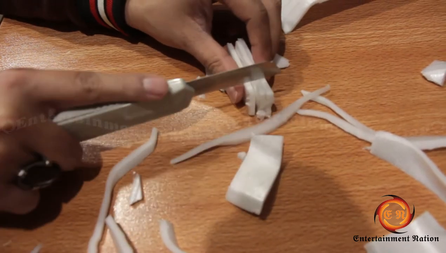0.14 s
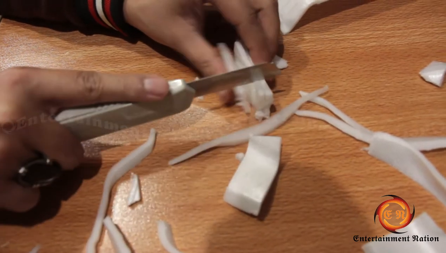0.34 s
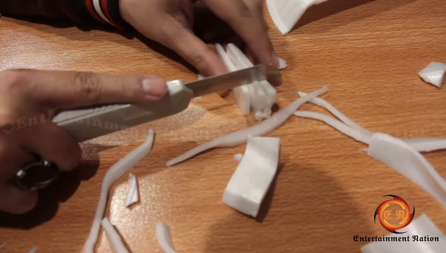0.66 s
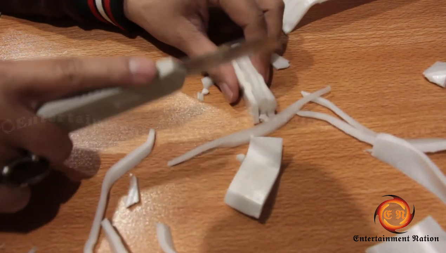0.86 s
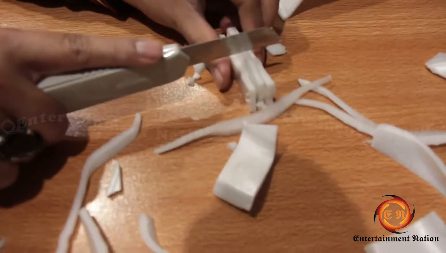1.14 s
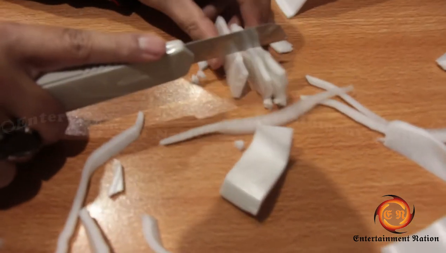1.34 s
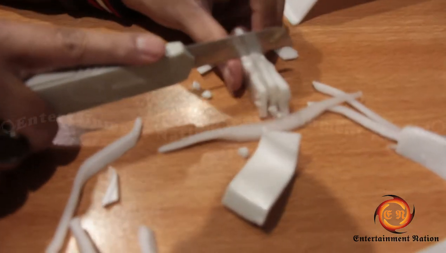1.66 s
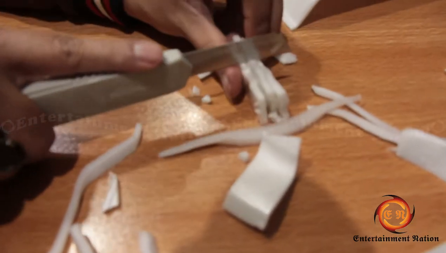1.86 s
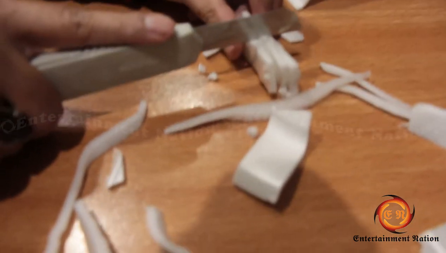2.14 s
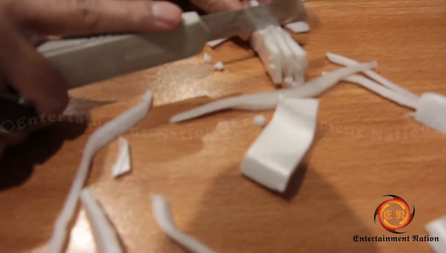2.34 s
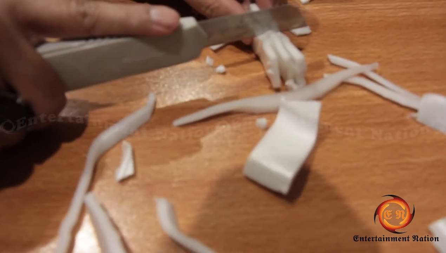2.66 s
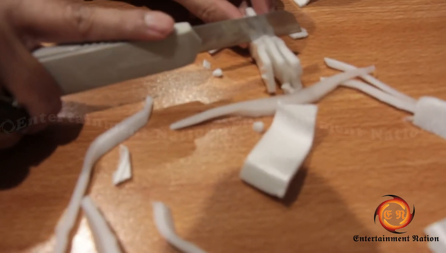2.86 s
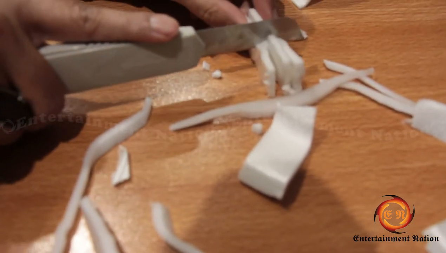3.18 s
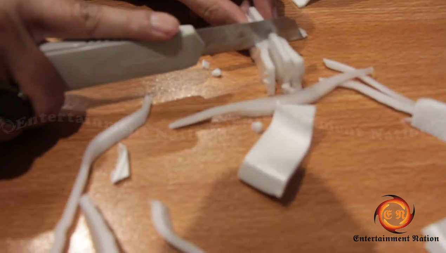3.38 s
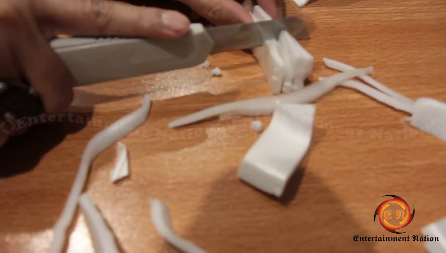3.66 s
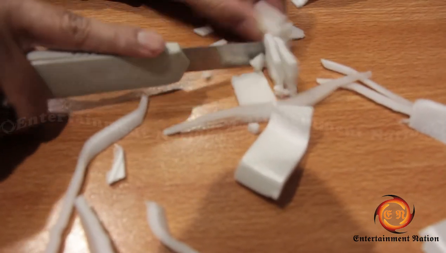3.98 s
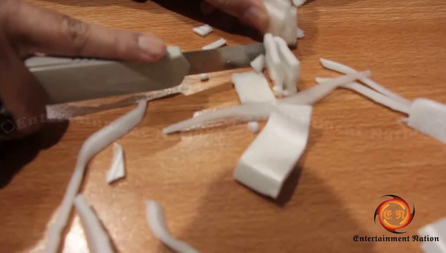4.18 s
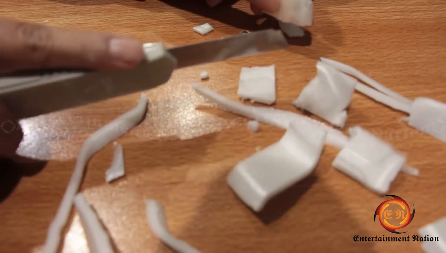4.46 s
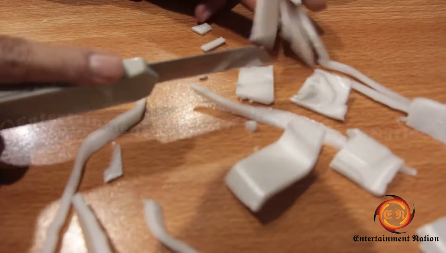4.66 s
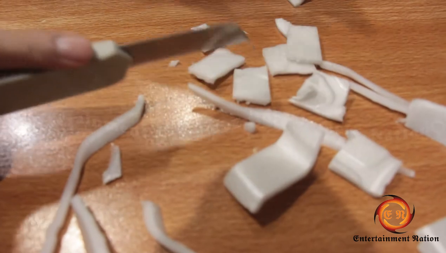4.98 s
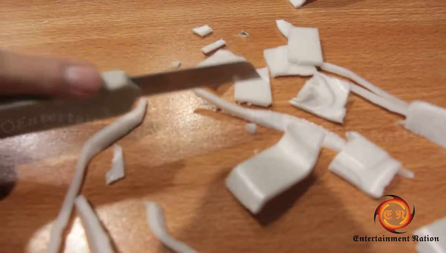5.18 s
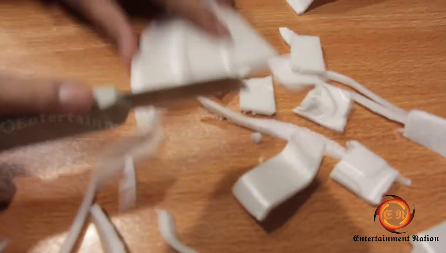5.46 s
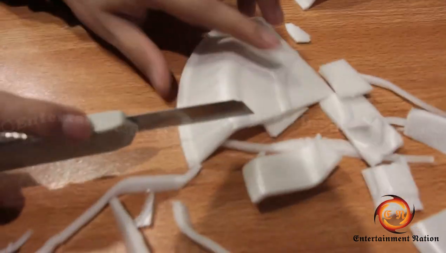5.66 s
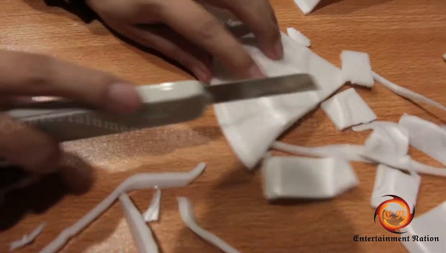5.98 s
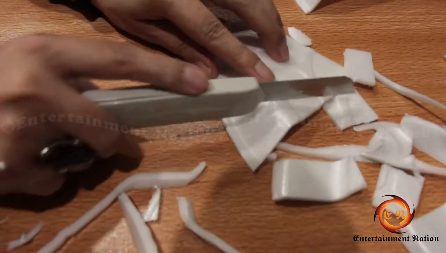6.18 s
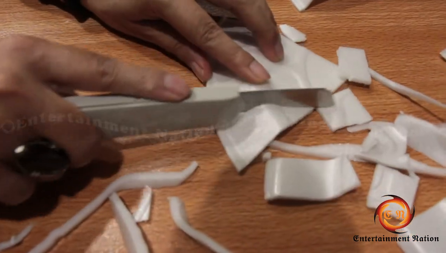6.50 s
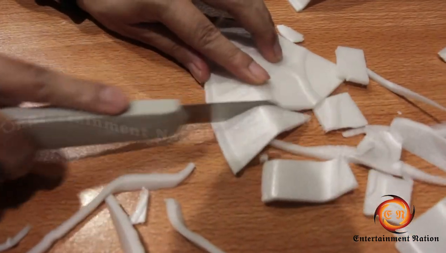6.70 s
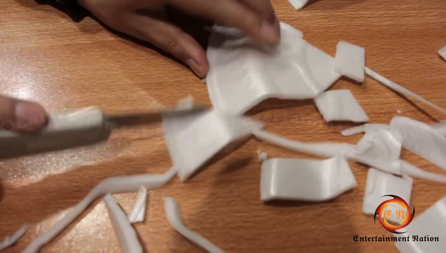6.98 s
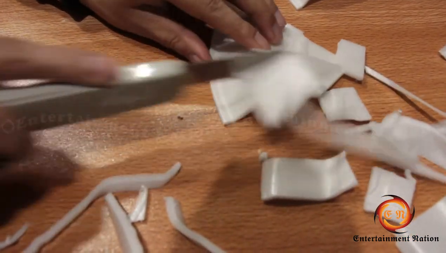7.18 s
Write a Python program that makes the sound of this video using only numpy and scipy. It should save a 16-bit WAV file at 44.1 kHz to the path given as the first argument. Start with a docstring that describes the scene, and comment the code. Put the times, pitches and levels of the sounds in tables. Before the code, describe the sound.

Close, short knife strokes crunch through foam plate, followed by a sliding scuff and one long creaking cut, over a faint hum.

```python
"""A wooden table in a small room with a faint mains hum, heard close up and a little to the right.
A utility knife is pressed through a folded stack of foam plate: the foam sticks and slips in a rasp,
its cell walls crack, and it parts with a crunch and a knock on the table. Offcuts scuff aside,
a new piece is dropped and slid into place, and the blade slices it with a creak and one sharp pop."""
import sys
import numpy as np
from scipy import signal
from scipy.fft import rfft, irfft, next_fast_len
from scipy.io import wavfile
from scipy.ndimage import uniform_filter1d, map_coordinates

SR = 44100
rng = np.random.default_rng(int(sys.argv[2]) if len(sys.argv) > 2 else 0)


def generate_wav(sig):
    """Save sig (samples, or channels by samples) to the path in sys.argv[1] as 16-bit PCM at SR."""
    pcm = np.round(np.clip(np.atleast_2d(sig).T, -1, 1) * 32767).astype(np.int16)
    wavfile.write(sys.argv[1], SR, pcm)


N = 323694

# pushes of the blade into the folded stack: start_s, length_s, hiss_db, rasp_db
STACK_PUSHES = [(0.005, 0.098, -56, -59), (0.188, 0.025, -45, -45), (0.366, 0.094, -55, -58.5),
                (0.471, 0.15, -49, -52), (0.666, 0.029, -41.5, -41.5), (0.724, 0.026, -60, -52),
                (0.753, 0.092, -47, -49), (0.946, 0.18, -58, -60.5), (1.151, 0.02, -50.5, -55),
                (1.232, 0.027, -53, -60), (1.329, 0.11, -49.5, -46.5), (1.482, 0.083, -52, -57),
                (1.565, 0.13, -47, -54.5), (1.732, 0.097, -54.5, -56), (2.026, 0.073, -45, -48),
                (2.183, 0.14, -53.5, -57.5), (2.381, 0.07, -48.5, -56), (2.527, 0.026, -44.5, -50.5),
                (2.645, 0.017, -48, -81), (2.785, 0.038, -41, -55.5), (2.977, 0.051, -40, -51),
                (3.116, 0.055, -44, -54), (3.188, 0.1, -38, -48.5), (3.423, 0.042, -41.5, -50.5),
                (3.585, 0.053, -42.5, -46.5), (3.741, 0.033, -48, -52), (3.785, 0.066, -36.5, -51),
                (3.918, 0.093, -37, -54)]
# the last layers give way in one swelling crunch: time_s, hiss_db, rasp_db
FINAL_CRUNCH = [(3.99, -38, -44), (4.005, -28, -38), (4.012, -23, -35), (4.022, -23.5, -31),
                (4.033, -21, -26), (4.046, -47, -35)]


def amp(db):
    """Decibels to gain."""
    return 10 ** (np.asarray(db) / 20)


def unit(x):
    """Scale to rms 1."""
    return x / np.sqrt(np.mean(x ** 2) + 1e-20)


def along(points, hz):
    """Read a curve of (freq_hz, value) points on a log frequency axis."""
    freqs, values = np.transpose(points)
    return np.interp(np.log(hz + 1), np.log(freqs + 1), values)


def wobble(rate):
    """A smooth random curve with rate knots a second."""
    return map_coordinates(rng.standard_normal(int(N * rate / SR) + 4), [np.arange(N) * rate / SR])


def filtered(x, response):
    """Pass x through a frequency response."""
    size = x.shape[-1]
    padded = 2 * next_fast_len(size // 2 + 2048)
    return irfft(rfft(x, padded) * response(np.fft.rfftfreq(padded, 1 / SR)), padded)[..., :size]


def causal(gain):
    """The minimum-phase response that has this gain."""
    cepstrum = irfft(np.log(np.maximum(gain, 1e-6)))
    half = len(cepstrum) // 2
    cepstrum[1:half] *= 2
    cepstrum[half + 1:] = 0
    return np.exp(rfft(cepstrum))


def add(track, start_s, sound):
    """Mix a sound into the track."""
    part = track[round(start_s * SR):][:len(sound)]
    part += sound[:len(part)]


def pushes(rows, attack_s, sag_db_per_s, release_db_per_s):
    """Hiss and rasp envelopes of short strokes: each bites, eases as the foam gives, then dies away."""
    gains, t = np.zeros((2, N)), np.arange(SR // 2) / SR
    for start_s, length_s, *levels in rows:
        fall_db = sag_db_per_s * t + release_db_per_s * np.maximum(t - length_s, 0)
        shape = np.minimum(t / attack_s, 1) * amp(-fall_db)
        for gain, db in zip(gains, levels):
            add(gain, start_s, amp(db) * shape)
    return gains


def long_stroke(curve):
    """Hiss and rasp envelopes of one long movement."""
    times, *levels = np.transpose(curve)
    return amp([np.interp(np.arange(N) / SR, times, db, left=-np.inf, right=-np.inf) for db in levels])


def room_tone(air_db, apart_db, hum_db, waver_db):
    """Still room air and a slightly wavering mains hum."""
    # colour of the air: freq_hz, level_db
    air_tone = [(20, -47), (50, -14), (90, -12), (150, -7), (230, -8.5), (350, -15.5), (700, -19.5),
                (2000, -25), (10000, -35.5), (16000, -46)]
    # mains hum: pitch_hz, level_db
    hum_partials = [(119.8, -56)]
    noise = rng.standard_normal(N) + amp(apart_db) * rng.standard_normal((2, N))
    air = unit(filtered(noise, lambda hz: amp(along(air_tone, hz))))
    t = np.arange(N) / SR
    hum = sum(amp(db) * np.sqrt(2) * np.sin(2 * np.pi * hz * t) for hz, db in hum_partials)
    return amp(air_db) * air + hum * amp(hum_db + waver_db * wobble(14))


def shifting_grip(x, depth_db):
    """Shifting grip and bend move the foam's resonances about."""
    spectrum = signal.stft(x, nperseg=512)[2]
    patches = uniform_filter1d(rng.standard_normal(spectrum.shape), size=4, axis=0)
    patches = uniform_filter1d(patches, size=20, axis=1)
    return signal.istft(spectrum * amp(depth_db * unit(patches)), nperseg=512)[1][:N]


def rub(gains, tone, slips_per_s, clump_db, scatter_db, grip_db):
    """Foam sticks and slips in tiny uneven jerks; the cells hiss above 3 kHz, the sheet rasps below."""
    hiss, rasp = gains
    jerks = (rng.random(N) < slips_per_s / SR) * rng.choice([-1, 1], N)
    jerks = jerks * amp(scatter_db * np.clip(rng.standard_normal(N), -2, 2))
    clumps = amp(clump_db * unit(wobble(240) + wobble(60)))
    friction = shifting_grip((unit(jerks) + 0.6 * rng.standard_normal(N)) * clumps, grip_db)
    body = irfft(causal(amp(along(tone, np.fft.rfftfreq(4096, 1 / SR)))))
    foam = signal.oaconvolve(friction, body)[:N]
    bending = filtered(foam, lambda hz: 1 / (1 + (hz / 3000) ** 8))
    return hiss * unit(foam - bending) + rasp * unit(bending)


def stack_cut():
    """The blade rasps through the folded stack, push by push, until the last layers give."""
    # colour of the rubbed stack: freq_hz, level_db
    stack_tone = [(350, -35), (600, -11), (869, -14.5), (1070, -7.5), (1430, -5), (2120, -8.5), (2440, 0.5),
                  (2870, -4.5), (3940, -3.5), (6500, -7.5), (9240, -11), (14300, -21), (16000, -30)]
    gains = pushes(STACK_PUSHES, attack_s=0.0098, sag_db_per_s=10.5, release_db_per_s=251)
    gains += long_stroke(FINAL_CRUNCH)
    return rub(gains, stack_tone, slips_per_s=700, clump_db=1.4, scatter_db=1.0, grip_db=2)


def crumbs(per_push, level_db, spread_db):
    """Small breaks at random moments of each push into the stack: start_s, crack_db, pop_db."""
    return [(start_s + length_s * rng.random(), *(np.array(levels) + rng.normal(level_db, spread_db)))
            for start_s, length_s, *levels in STACK_PUSHES for _ in range(per_push)]


def wall_crack(drive, dull_hz):
    """A breaking cell wall rings; each break frees a wall of slightly different size."""
    # resonances of the wall: centre_hz, width_hz, level_db
    wall_modes = [(3880, 420, 5.5), (4700, 720, 4), (6220, 1800, 1.5), (9000, 2900, -2.5)]
    modes = [(hz * rng.normal(1, 0.025), width, rng.normal(db, 1.5)) for hz, width, db in wall_modes]

    def response(hz):
        power = sum(abs(amp(db) * hz * width / (centre ** 2 - hz ** 2 + 1j * hz * width)) ** 2
                    for centre, width, db in modes)
        return causal(np.sqrt(power)) / (1 + (hz / dull_hz) ** 4)
    return filtered(drive, response)


def snaps(crumble, splinter, echo_s, echo_gain, crack_trim_db, pop_trim_db):
    """A fracture starts with one break and runs on for a few milliseconds; the table throws it back."""
    # sharp breaks and taps, where cell walls crack and the sheet pops: start_s, crack_db, pop_db
    breaks = [(0.184, -37, -39), (0.2, -38, -50), (0.2625, -29, -40), (0.2647, -31.5, -31.5),
              (0.37, -38, -44), (0.501, -39, -55), (0.765, -47, -46), (1.072, -38, -41.5),
              (1.08, -39.5, -39), (1.2405, -35, -47), (1.4983, -36.5, -39.5), (1.692, -37, -40),
              (1.9555, -46, -53), (1.987, -38.5, -47), (2.084, -38.5, -37), (2.1024, -35, -40),
              (2.3304, -40.5, -43), (2.3908, -31, -41), (2.536, -35, -45), (2.788, -35, -58),
              (2.8002, -31.5, -43.5), (2.8618, -35.5, -43.5), (2.948, -32.5, -42), (2.962, -33, -41),
              (2.9705, -38, -45), (2.9835, -13.5, -32), (2.992, -28, -41), (3.051, -35, -44),
              (3.1935, -11, -27.5), (3.2085, -14, -27), (3.267, -29, -44), (3.415, -38, -50),
              (3.4262, -19.5, -41), (3.4936, -36, -61.5), (3.5623, -29, -38), (3.6054, -35, -35.5),
              (3.6347, -35.5, -43), (3.7804, -25.5, -36), (3.804, -25, -37), (3.861, -34, -46),
              (3.899, -30, -40.5), (3.932, -33, -47), (3.9435, -32, -43), (3.983, -32, -38),
              (4.011, -16.5, -30), (4.0288, -16, -30), (4.0355, -19, -13.5), (4.2355, -44, -61),
              (4.252, -43, -48), (4.319, -44, -43), (4.488, -46, -51), (4.502, -39, -42.5),
              (4.743, -45.5, -48), (5.9204, -40, -25), (5.9255, -36, -20), (6.1373, -40, -41.5),
              (6.2472, -19, -23), (6.4922, -25.5, -35), (6.601, -23, -28), (6.6108, -23, -22),
              (6.6149, -13, -11.5), (6.6177, -22.5, -19.5), (6.705, -39, -27), (6.774, -41, -30),
              (6.7988, -27, -28), (6.8367, -25, -33), (6.8634, -41, -26), (7.012, -34, -50),
              (7.058, -35.5, -34.5)]
    # colour of the popping sheet: freq_hz, level_db
    pop_tone = [(100, -22), (450, -14.5), (900, -12.5), (1400, -3.5), (1850, -5), (2250, 1), (2900, -6.5),
                (3500, -13.5), (5000, -20), (15000, -65)]
    out, t = np.zeros(N), np.arange(SR // 20) / SR
    level_span = SR // 200  # each snap carries the energy of 5 ms at its level
    small_breaks = crumbs(per_push=2, level_db=-2.5, spread_db=3) + judder(count=7)
    for start_s, crack_db, pop_db in breaks + small_breaks:
        age = t * amp(crumble * max(crack_db, pop_db))  # weak breaks crumble more slowly
        shape = (1 - np.exp(-age / 0.00014)) * amp(-60 * np.maximum(age - 0.00065, 0) / 0.012)
        run = rng.standard_normal(len(t)) * shape
        fracture = (t == 0) + splinter * run / np.linalg.norm(run)
        delay_s = echo_s * amp(rng.normal())
        drive = filtered(fracture, lambda hz: 1 + echo_gain * np.exp(-2j * np.pi * hz * delay_s))
        crack = wall_crack(drive, dull_hz=14200)
        pop = filtered(drive, lambda hz: causal(amp(along(pop_tone, hz))))
        for sound, db in ((crack, crack_db + crack_trim_db), (pop, pop_db + pop_trim_db)):
            add(out, start_s, amp(db) * np.sqrt(level_span) * sound / np.linalg.norm(sound))
    return out


def blade_ticks(level_db):
    """A catch sets the thin steel ringing until the foam damps it."""
    # the blade is flicked as it catches: start_s, level_db
    catches = [(0.263, -34), (1.24, -32.5)]
    # modes of the blade: pitch_hz, level_db, t60_s
    blade_modes = [(2360, 3, 0.035), (6600, -8, 0.05), (7760, -5, 0.06), (8500, -2, 0.029)]
    out, t = np.zeros(N), np.arange(SR // 8) / SR
    for start_s, db in catches:
        ring = sum(amp(mode_db + rng.normal() - 60 * t / t60) * np.sin(2 * np.pi * hz * t)
                   for hz, mode_db, t60 in blade_modes)
        add(out, start_s, amp(db + level_db) * ring)
    return out


def judder(count):
    """The blade judders in a short, almost even train of slips: start_s, crack_db, pop_db."""
    # the train of slips: start_s, rate_hz, crack_db, pop_db
    slip_train = (3, 81.5, -39, -45.5)
    start_s, rate_hz, *levels = slip_train
    return [(start_s + rng.normal(k, 0.068) / rate_hz, *levels) for k in range(count)]


def creak(gain, centre_hz, width_hz, wander, slips_per_s, level_db):
    """Uneven slips ring the flexing sheet, whose one strong resonance wanders as the cut moves on."""
    size = len(gain)
    jerks = (rng.random(size) < slips_per_s / SR) * np.exp(2j * np.pi * rng.random(size))
    jerks *= amp(2.6 * rng.standard_normal(size))
    ring = signal.lfilter([1], [1, -np.exp(-np.pi * width_hz / SR)], jerks)
    ring = signal.lfilter([1], [1, -np.exp(-4 * np.pi * width_hz / SR)], ring)  # rounds each attack
    pitch_hz = centre_hz * (1 + wander * wobble(40)[:size])
    return amp(level_db) * gain * unit(np.real(ring * np.exp(2j * np.pi * np.cumsum(pitch_hz) / SR)))


def stack_creaks(attack_s, release_db_per_s):
    """A bent layer of the stack sounds its own resonance for as long as the blade drags on it."""
    # drags on a layer: start_s, length_s, pitch_hz, width_hz, level_db
    drags = [(3.205, 0.08, 900, 199, -49), (3.426, 0.0054, 3860, 260, -30), (3.44, 0.083, 3910, 300, -51),
             (3.77, 0.225, 1294, 130, -54.5), (4.04, 0.11, 2246, 300, -41)]
    out, t = np.zeros(N), np.arange(SR // 3) / SR
    for start_s, length_s, hz, width_hz, db in drags:
        shape = np.minimum(t / attack_s, 1) * amp(-release_db_per_s * np.maximum(t - length_s, 0))
        add(out, start_s, creak(shape, hz, width_hz, wander=0.015, slips_per_s=900, level_db=db))
    return out


def blade_squeaks(rise, waver, rough_db, overtone_db, bright_hz):
    """Now and then the slips lock into a pitch, which climbs as the blade speeds up."""
    # squeaks of the blade in the foam: start_s, length_s, target_pitch_hz, level_db
    squeaks = [(3.757, 0.063, 1286, -53), (7.059, 0.0037, 2940, -25.5)]
    out, drift, flutter = np.zeros(N), wobble(150), wobble(400.6)
    for start_s, length_s, hz, db in squeaks:
        span = np.arange(round(start_s * SR), round((start_s + length_s) * SR))
        progress = np.linspace(0, 1, len(span))
        pitch_hz = hz * (1 - rise * np.exp(-6 * progress) + waver * drift[span])
        phase = 2 * np.pi * np.cumsum(pitch_hz) / SR
        tone = sum(amp(overtone_db * (k - 1)) / (1 + (k * hz / bright_hz) ** 4) * np.sin(k * phase)
                   for k in range(1, 4))
        swell = np.sqrt(abs(np.sin(np.pi * progress)))
        add(out, start_s, unit(tone) * swell * amp(db + rough_db * flutter[span]))
    return out


def table_knocks(level_db, favour_db, thud_t60_s, thud_hz, thud_db):
    """Soft blows ring the table's low modes under a dull thud; the spot struck brings one forward."""
    # blows of blade, hand and plate: start_s, level_db, favoured_hz
    blows = [(4.032, -26, 232), (4.319, -43.5, 389), (5.287, -28.5, 389), (5.313, -30, 389),
             (6.615, -39, 232)]
    # modes of the table top: pitch_hz, level_db, t60_s
    table_modes = [(126.2, -6.5, 0.65), (174.4, -7, 0.42), (232, -11.5, 0.39), (389, -7, 0.24),
                   (518, -4.5, 0.08)]
    out, t = np.zeros(N), np.arange(SR // 2) / SR
    attack = 1 - np.exp(-t / 0.000087)
    for start_s, db, spot_hz in blows:
        favoured_hz = min(table_modes, key=lambda mode: abs(mode[0] - spot_hz))[0]
        ring = np.zeros(len(t))
        for hz, mode_db, t60 in table_modes:
            struck_db = mode_db + favour_db * (hz == favoured_hz) + rng.normal()
            ring += amp(struck_db - 60 * t / t60) * np.sin(2 * np.pi * (hz * t + rng.random()))
        thud = unit(filtered(rng.standard_normal(len(t)), lambda hz: 1 / (1 + 1j * hz / thud_hz) ** 2))
        thud *= amp(thud_db - 60 * t / thud_t60_s)
        add(out, start_s, amp(db + level_db) * (ring + thud) * attack)
    return filtered(out, lambda hz: (1j * hz / (45 + 1j * hz)) ** 3)  # low cut


def offcuts():
    """The foam creaks as it parts, and the offcuts scuff and creak over the table."""
    # scuffs: start_s, length_s, hiss_db, rasp_db
    scuffs = [(4.04, 0.078, -50.5, -33.5), (4.32, 0.056, -51.5, -47.5), (4.615, 0.025, -55, -72),
              (7.295, 0.025, -53, -54.5)]
    # colour of a scuff: freq_hz, level_db
    scuff_tone = [(250, -23), (450, -12.5), (900, -14.5), (1400, -8), (2250, -12), (2800, -11.5),
                  (3400, -4.5), (4600, 3), (10000, -2), (16000, -13)]
    gains = pushes(scuffs, attack_s=0.0048, sag_db_per_s=18, release_db_per_s=183)
    scuffing = rub(gains, scuff_tone, slips_per_s=600, clump_db=2.0, scatter_db=1.5, grip_db=2.5)
    flex = long_stroke(FINAL_CRUNCH)[1] + gains[1]  # the creak follows the rasp
    creaking = creak(flex, centre_hz=3490, width_hz=370, wander=0.0304, slips_per_s=540, level_db=-7.5)
    return scuffing + creaking


def sheet_slide():
    """The new piece rubs over the table as it slides into place."""
    # the slide: time_s, hiss_db, rasp_db
    slide_curve = [(5.2855, -36.5, -35.5), (5.33, -35.5, -39), (5.355, -26.5, -28.5), (5.4, -32, -38.5),
                   (5.57, -33, -36.5), (5.605, -27, -31.5), (5.68, -43.5, -40.5), (5.73, -67, -64)]
    # its colour: freq_hz, level_db
    slide_tone = [(300, -23.5), (850, -15), (1360, -4), (1780, -6.5), (2400, 3), (2900, -0.5), (3500, 1.5),
                  (4100, -3.5), (6000, -3.5), (10400, -9.5), (16000, -23)]
    gains = long_stroke(slide_curve)
    return rub(gains, slide_tone, slips_per_s=1800, clump_db=1.85, scatter_db=0.5, grip_db=2.0)


def sheet_slice():
    """The blade nicks the single sheet, then parts it in one long, creaking draw."""
    # first short pushes: start_s, length_s, hiss_db, rasp_db
    nicks = [(5.865, 0.064, -43.5, -44.5), (5.925, 0.13, -37.5, -38), (6.218, 0.036, -44, -44.5),
             (6.25, 0.079, -44.5, -46.5)]
    # the long draw: time_s, hiss_db, rasp_db
    draw_curve = [(6.374, -54, -56), (6.388, -37.5, -39), (6.408, -26, -31.5), (6.45, -35, -40.5),
                  (6.58, -35.5, -41), (6.67, -35, -38), (6.725, -30.5, -30), (6.765, -32.5, -35),
                  (6.8, -21, -28), (6.87, -35, -36.5), (6.965, -36, -34), (7.0, -60, -38.5),
                  (7.04, -47, -43.5), (7.085, -38.5, -44), (7.16, -75, -63)]
    # colour of the cut: freq_hz, level_db
    slice_tone = [(250, -32), (450, -17), (950, -14), (1450, -3.5), (1850, -6.5), (2250, -1.5),
                  (2900, -3.5), (3400, -5), (4800, -7.5), (9000, -13), (16000, -29.5)]
    # the sheet's moving resonance: time_s, pitch_hz
    sheet_ring = [(5.87, 3136), (5.912, 3135), (5.928, 2217), (6.25, 2202), (6.39, 3050), (6.53, 3338),
                  (6.61, 2180), (6.8, 2220), (6.98, 2370), (7.06, 2900)]
    gains = pushes(nicks, attack_s=0.0043, sag_db_per_s=5, release_db_per_s=260)
    gains += long_stroke(draw_curve)
    slicing = rub(gains, slice_tone, slips_per_s=900, clump_db=1.5, scatter_db=0.0, grip_db=1.5)
    sheet_hz = np.interp(np.arange(N) / SR, *np.transpose(sheet_ring))
    creaking = creak(gains[1], sheet_hz, width_hz=280, wander=0.025, slips_per_s=400, level_db=-2.0)
    return amp(-1) * slicing + creaking


def reflections(x, decay, tone, build_s, renewals_per_s):
    """Diffuse reflections, different at each microphone and renewed as the hands move."""
    out, hop = np.zeros((2, N + 2 * SR)), SR // renewals_per_s
    length = int(SR * max(t60 for _, t60 in decay)) + 256
    for start in range(0, N, hop):
        hz, t, noise = signal.stft(rng.standard_normal((2, length)), SR, nperseg=256)
        fade = amp(along(tone, hz)[:, None] - 60 * t / along(decay, hz)[:, None])
        tail = signal.istft(noise * fade * (1 - np.exp(-t / build_s)), SR, nperseg=256)[1]
        wet = signal.fftconvolve(x[None, start:start + hop], tail / np.linalg.norm(tail[0]), axes=1)
        out[:, start:start + wet.shape[1]] += wet
    return out[:, :N]


def near_scatter(direct):
    """Scatter off hands and table pulls the treble of the two channels apart."""
    # decay of the scatter: freq_hz, t60_s
    near_decay = [(1000, .02), (12000, .02)]
    # its colour: freq_hz, level_db
    near_tone = [(300, -26), (1000, -17), (2000, -8), (4000, -3), (12000, 0)]
    side = reflections(direct, near_decay, near_tone, build_s=0.00063, renewals_per_s=12)[0]
    return np.array([side, -side])


def room_reverb(direct):
    """The small room answers, ringing longest in the bass."""
    # decay of the room: freq_hz, t60_s
    reverb_decay = [(200, 1), (2000, 0.41), (6000, 0.47), (14000, 0.26)]
    # its colour: freq_hz, level_db
    reverb_tone = [(100, 2.3), (1500, 3.7), (5000, 3.7), (14000, 4.2)]
    return reflections(direct, reverb_decay, reverb_tone, build_s=0.00057, renewals_per_s=3)


def microphones(sound):
    """The right microphone is nearer and hears the scene louder, most of all in the bass."""
    # stereo lean: freq_hz, right_minus_left_db
    balance = [(100, 9), (450, 3.5), (2000, 5.5), (12000, 3.5)]
    lean = lambda hz: amp(np.array([[-.5], [.5]]) * along(balance, hz))
    return filtered(sound, lambda hz: lean(hz) / lean(hz).mean(axis=0))


def scene():
    """All the work at the table, its room and the hum."""
    direct = amp(-1.04) * (stack_cut() + offcuts() + sheet_slide() + sheet_slice())
    direct += snaps(crumble=0.22, splinter=2.5, echo_s=0.0016, echo_gain=0.22,
                    crack_trim_db=-1.9, pop_trim_db=-1.6)
    direct += blade_ticks(level_db=-0.5)
    direct += stack_creaks(attack_s=0.001, release_db_per_s=700)
    direct += blade_squeaks(rise=0.148, waver=0.043, rough_db=6.0, overtone_db=-18.0, bright_hz=3830)
    direct += table_knocks(level_db=-5.0, favour_db=7.5, thud_t60_s=0.032, thud_hz=580, thud_db=10.5)
    space = amp(-3.5) * near_scatter(direct) + amp(-7.5) * room_reverb(direct)
    bed = room_tone(air_db=-52.0, apart_db=3, hum_db=-1.5, waver_db=3.0)
    return microphones(direct + space + bed)


def record(dry):
    """Peaks clip at full scale, and a steep low-pass cuts the treble at 16 kHz."""
    return filtered(np.clip(dry, -1, 1), lambda hz: 1 / (1 + (hz / 16000) ** 160))


dry = scene()
out = record(dry)
generate_wav(out)
```